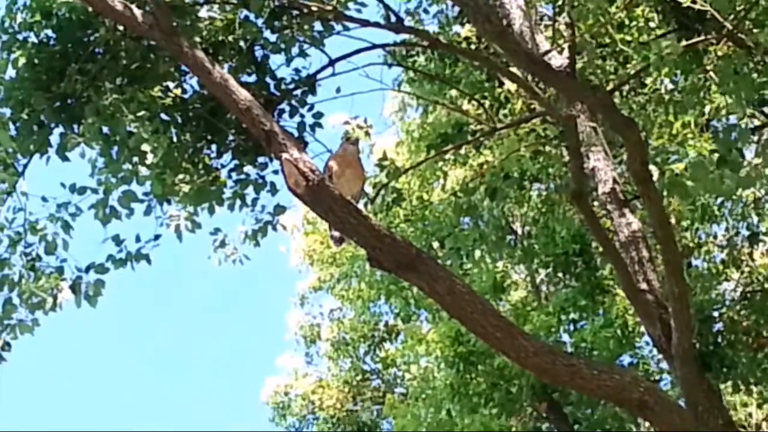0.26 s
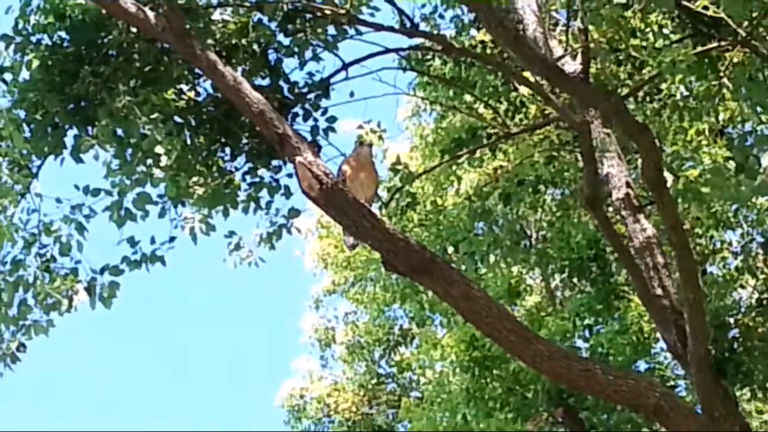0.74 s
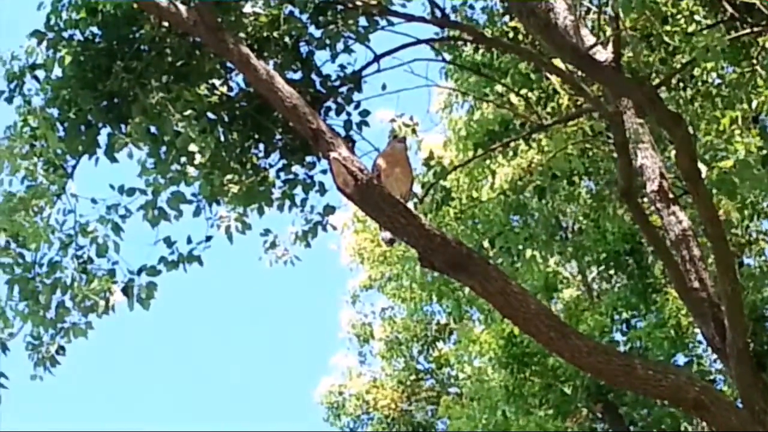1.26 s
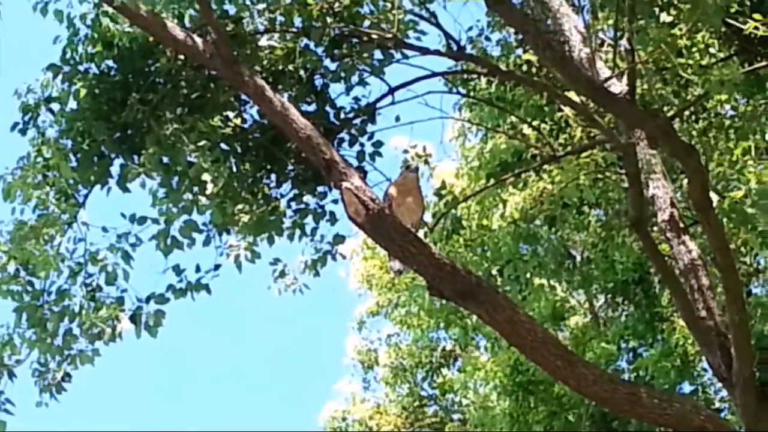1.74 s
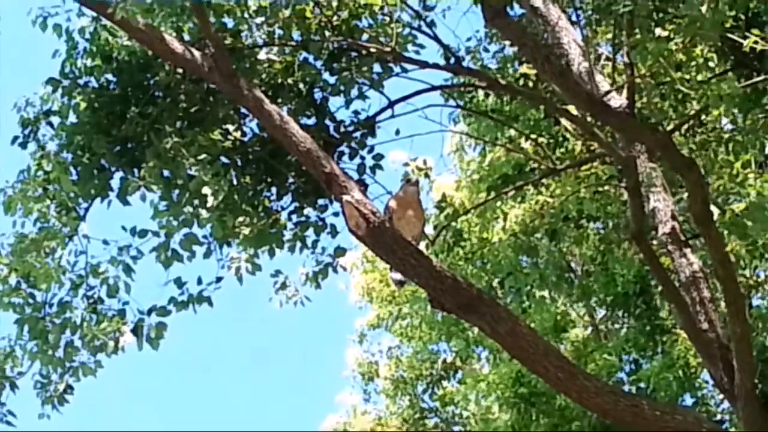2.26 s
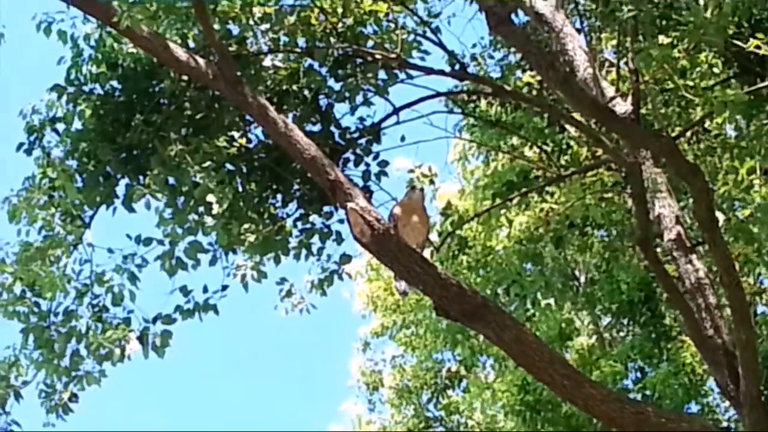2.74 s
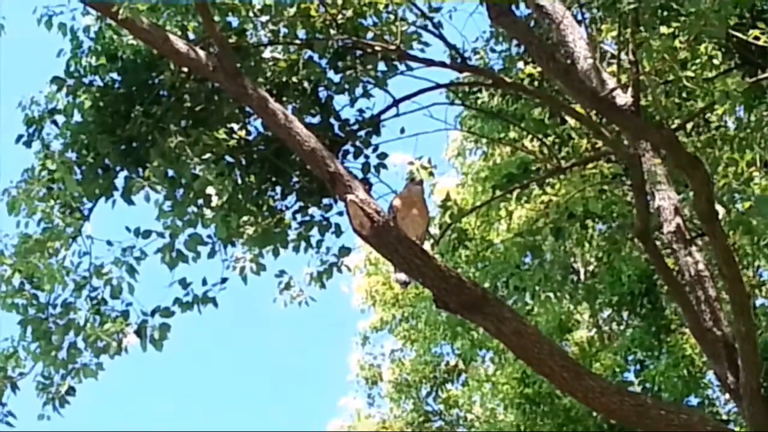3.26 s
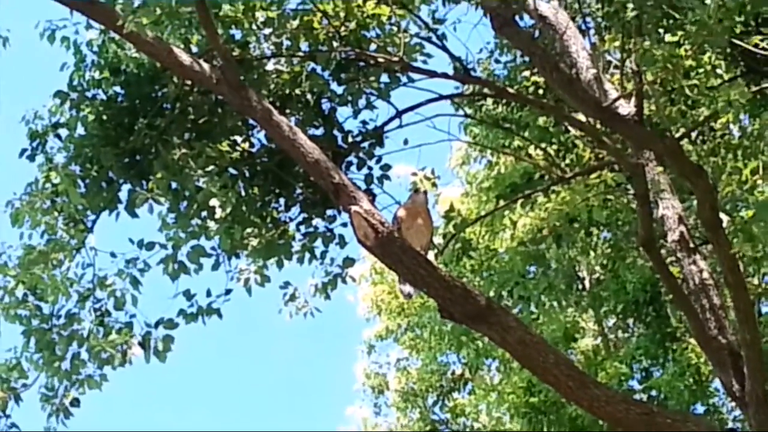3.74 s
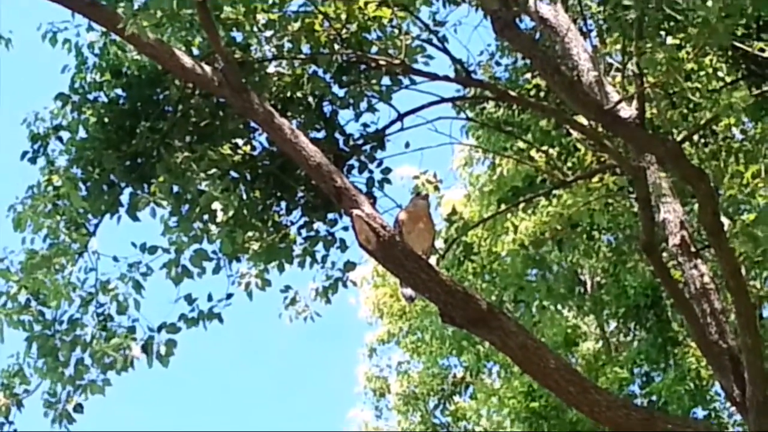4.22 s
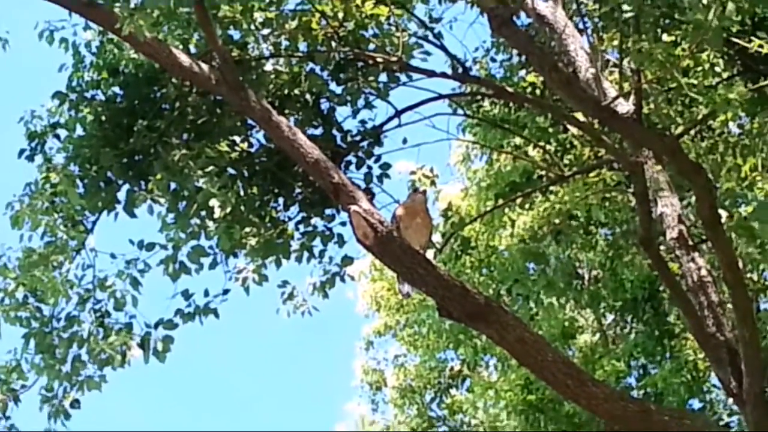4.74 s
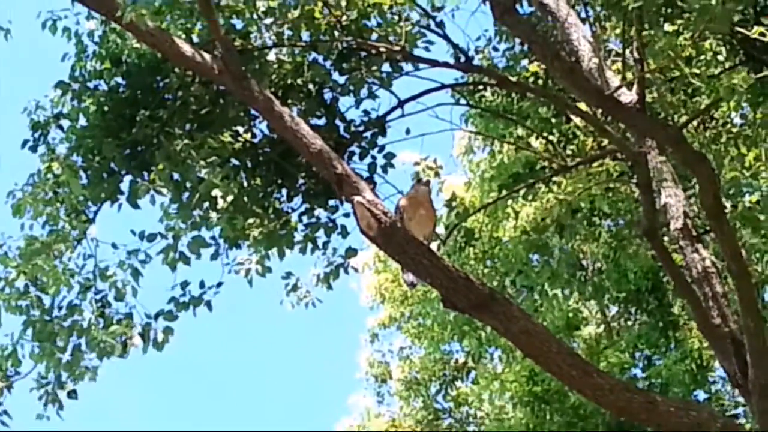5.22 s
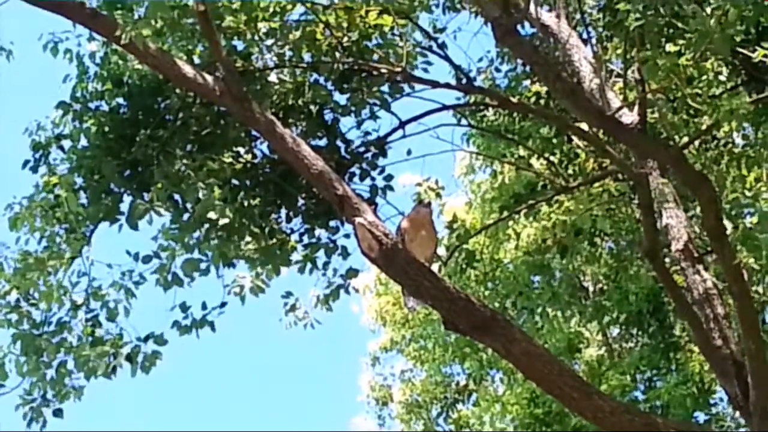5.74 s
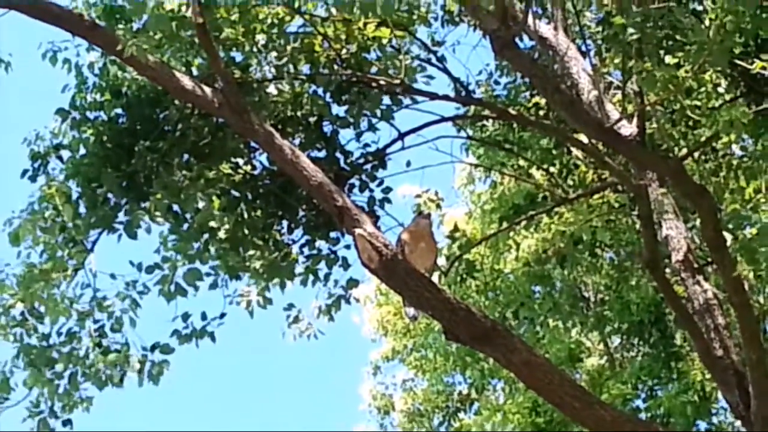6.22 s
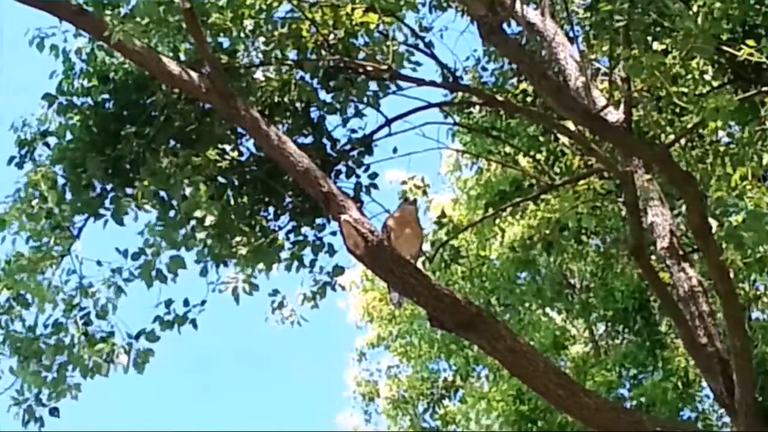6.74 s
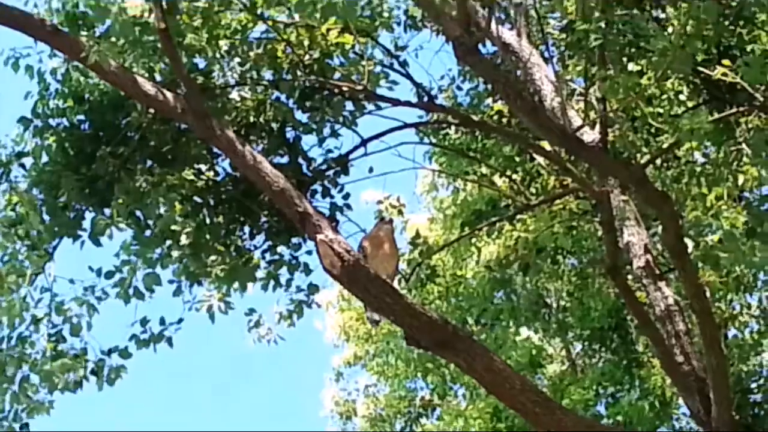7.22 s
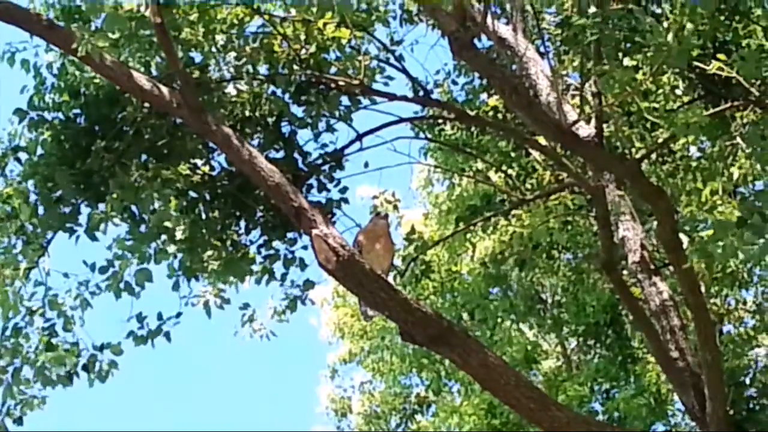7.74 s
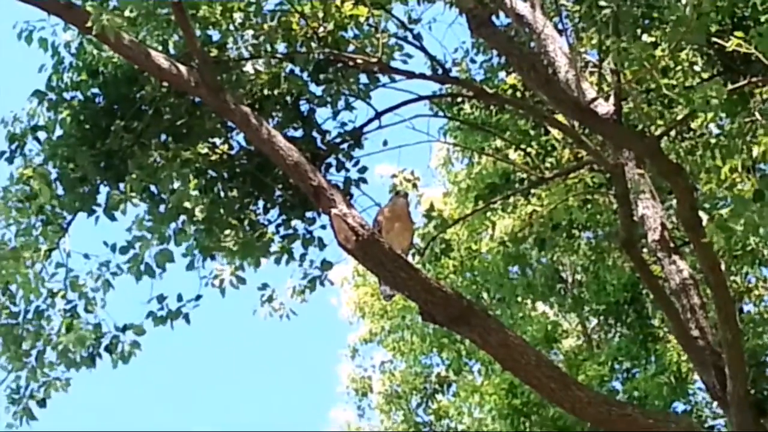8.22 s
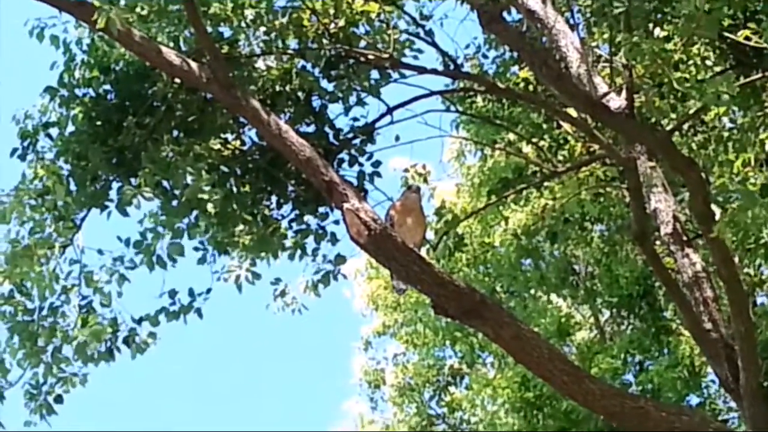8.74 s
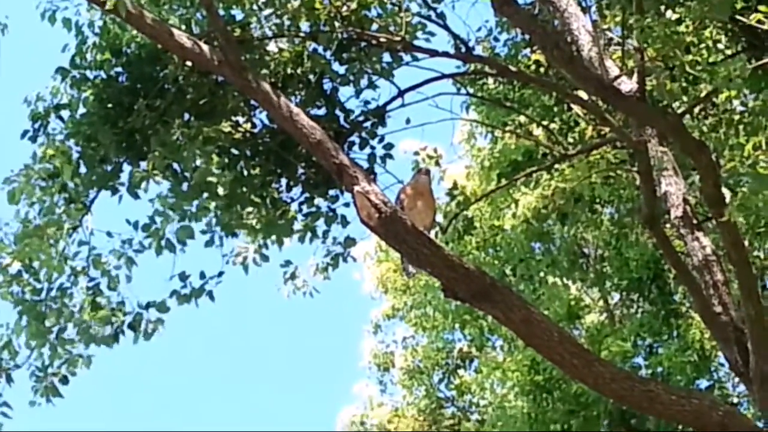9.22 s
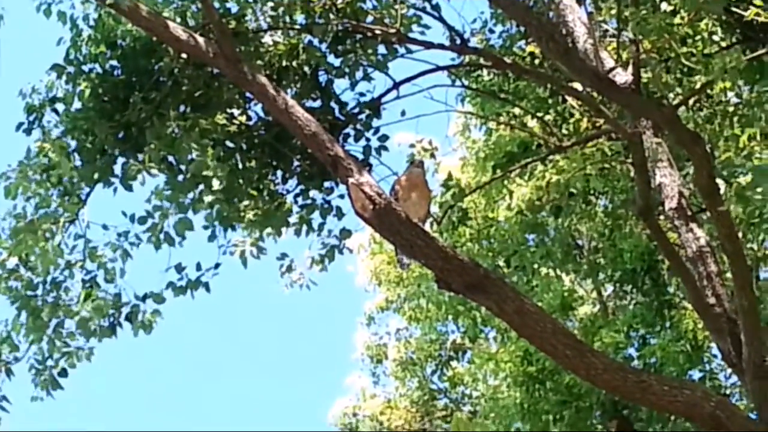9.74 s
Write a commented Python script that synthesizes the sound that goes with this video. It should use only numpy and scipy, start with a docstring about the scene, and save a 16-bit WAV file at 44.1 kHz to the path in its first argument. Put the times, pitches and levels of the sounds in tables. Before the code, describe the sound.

Outdoors under leafy trees, a perched hawk screams about once a second, eleven times. Each cry whoops quickly upward, falls loud and piercing, then cracks to a softer, lower tail. Wind rumbles and thumps against a hand-held stereo microphone, harder on the left, easing in the middle and growing heavy and clipping late. Faint leaf hiss and distant traffic lie behind.

```python
"""A hawk overhead screams eleven times: a quick upward whoop, a loud falling note, a break to a softer low
note. Each scream is a sum of twelve partials on one gliding pitch, roughened by breath and echoed by foliage.
Gusts buffet the two ports of a hand-held recorder, the left harder, as band-limited noise and short swings. The
recorder's case ticks (filtered impulses), and a brief buzz sounds once (odd partials). Leaves and far traffic
hiss behind (bands of noise), with a faint narrow hum."""
import sys
import numpy as np
from scipy import signal
from scipy.io import wavfile

SR = 44100
rng = np.random.default_rng(int(sys.argv[2]) if len(sys.argv) > 2 else 0)


def log_audio(samples):
    """Write samples as a 16-bit WAV file to the path given in sys.argv[1]."""
    # one column per channel
    frames = np.atleast_2d(samples).T
    # limit to full scale, then quantise
    limited = np.clip(frames, -1, 1)
    pcm = np.round(limited * 32767).astype(np.int16)
    wavfile.write(sys.argv[1], SR, pcm)


N = 439677  # samples, just under ten seconds

# Far background spectrum. Each row: frequency in Hz, relative density in dB per Hz.
AIR_SPECTRUM = [(24, -38), (40, -6), (233, -16.5), (419, -23.5), (461, -10.5), (869, -10), (1240, -13),
                (4830, -35.5), (7210, -58.5), (9110, -24.5), (11000, -71.5), (14300, -92), (22000, -120)]
# Correlation of the background at the ports. Each row: frequency in Hz, likeness (later held within -1 to 1).
PORT_LIKENESS = [(60, -0.54), (220, 1), (820, 0.36), (3050, -2.3), (11300, 0.14)]
# Rustle of the leaves. Each row: time in seconds, level of the hiss in dB.
RUSTLE_LEVEL = [(0, -53), (.75, -55.5), (1.6, -56.5), (2.7, -60), (3.8, -58.5), (4.75, -57.5), (5.7, -59),
                (6.6, -53.5), (7.55, -55.5), (8.5, -55.5), (9.0, -53.5), (9.45, -57), (9.97, -54)]
# Resonant bands of the rustle. Each row: centre in Hz, width in Hz, relative level in dB.
RUSTLE_BANDS = [(2800, 1600, 9.5), (4770, 510, 2.5), (5800, 1100, -3), (9060, 1000, 2.5)]
AIR_DB = -44.5  # rms over both ports
RUSTLE_FLICKER_DB = 1.5  # rms of each band's level
RUSTLE_TOP_HZ = 10200
HUM_HZ, HUM_DB = 533.6, -53

# Ticks of the case. Each row: time in seconds, level in dB, left minus right in dB, upper edge in Hz.
CASE_TICKS = [(0.7175, -22.5, -15, 2180), (1.3467, -14, -9, 2420), (4.788, -24.5, -8, 6000),
              (6.1559, -20, 0, 5150), (6.2565, -15, -14, 4000), (6.5133, -24, 1, 4740),
              (6.54, -24, -8, 3500), (6.606, -24, -6, 4800), (6.6879, -22.5, -5, 3500),
              (8.3998, 5, -28, 3404), (9.0384, -21, 50, 3500)]
# Envelope of the buzz. Each row: time in seconds, level in dB.
BUZZ_LEVEL = [(5.93, -82), (5.98, -32.5), (6.38, -37), (6.42, -75.5)]
# Odd partials of the buzz. Each row: multiple of the fundamental, relative level in dB.
BUZZ_PARTIALS = [(1, 1), (3, -32.5), (5, -16.5), (7, -13), (9, -16.5)]
BUZZ_HZ, BUZZ_PAN_DB = 196, 3.0

# Wind drive. Each row: time in seconds, mean gust at the left port in dB, at the right port in dB.
GUSTS = [(0, -14, -20), (.2, -36.5, -28.5), (.45, -29, -27), (.85, -19, -26), (1.1, -28, -34),
         (1.27, -37.5, -47), (1.5, -30, -30), (1.78, -30.5, -35.5), (2.1, -66, -52.5), (2.85, -53, -55),
         (3.05, -31, -30.5), (3.25, -49, -58), (3.55, -61, -48), (3.73, -24, -20.5), (3.88, -41.5, -70),
         (4.02, -43, -20), (4.3, -34, -53), (4.75, -37.5, -38), (5.1, -34, -31), (5.27, -50, -61),
         (5.75, -44, -40.5), (6, -27.5, -25), (6.55, -25, -25.5), (6.78, -16.5, -17), (7, -28, -38),
         (7.25, -27, -28.5), (7.4, -17.5, -21.5), (7.85, -22, -31.5), (8, -45.5, -43), (8.13, -19, -27),
         (8.55, -15, -17.5), (8.85, -23.5, -23), (9.1, -18.5, -22), (9.25, -30, -29), (9.4, -22.5, -22.5),
         (9.74, -26.5, -22), (9.86, -74, -45), (9.97, -26, -19)]
# Placed buffets. Each row: centre in seconds, envelope peak in dB, frequency in Hz, port (0 left, 1 right).
PLACED_BUFFETS = [(0.025, -8, 298, 0), (.038, -3, 339, 0), (.056, -5.5, 323, 0), (0.447, -4, 314, 0),
                  (0.771, -5, 263, 0), (.785, -2, 423, 0), (.812, 0, 300, 0), (0.83, 0, 233, 0),
                  (0.856, 1.5, 377, 0), (.937, -4.5, 320, 0), (1.039, -9.5, 286, 0), (1.419, -9, 235, 0),
                  (1.647, 0.5, 320, 0), (3.697, -10, 273, 1), (5.122, -9.5, 206, 0), (6.149, -4, 259, 0),
                  (6.183, -2, 330, 0), (6.676, -8, 237, 0), (6.727, 2.8, 275, 0), (6.766, -3.5, 318, 0),
                  (6.769, -6, 243, 1), (6.837, -2.5, 320, 0), (6.851, -8, 373, 0), (6.914, -0.5, 383, 0),
                  (7.06, -4.5, 280, 0), (7.331, -3, 246, 0), (7.508, -5, 292, 0), (7.543, -2.5, 484, 0),
                  (7.622, 1.5, 288, 0), (7.791, 4, 330, 0), (7.826, 5.5, 280, 0), (8.179, 3.5, 418, 0),
                  (8.203, -19, 339, 0), (8.235, -4, 366, 0), (8.403, 5, 414, 0), (8.415, -5, 370, 0),
                  (8.468, 4.5, 270, 0), (8.479, -6, 269, 0), (8.523, -5, 390, 0), (8.595, 0.5, 293, 0),
                  (8.624, 7.5, 520, 0), (8.644, 0.5, 324, 1), (8.651, 3, 383, 0), (8.687, 0, 446, 0),
                  (8.7, -9, 309, 0), (8.744, -4.5, 233, 1), (8.864, -2, 377, 0), (9.04, 3, 330, 0),
                  (9.057, 1.3, 292, 0), (9.179, -2, 352, 0), (9.193, -1, 420, 0), (9.345, -1, 440, 0),
                  (9.387, -2, 294, 0), (9.44, -5, 222, 1), (9.683, -5.5, 237, 1), (9.698, -3.5, 280, 1),
                  (9.711, -4, 289, 1), (9.737, -5.5, 233, 1)]
GUST_WANDER_DB = 3.87  # rms, independent at each port
LUMPY_DB, RUMBLE_RISE = 11.0, .58  # bound of the eddies' level in dB; exponent tilting the rumble with gust
PORT_TOP_HZ = (528, 330)  # the left port's rumble reaches higher
PORT_DEEP_DB, PORT_HIGH_DB = (-2, -2), -1  # shares of the deep and of the higher rumble
# lesser buffets: mean rate per port, level over the gust, a quarter of the full range, mid frequency per port
SMALL_PER_S, SMALL_OVER_DB, SMALL_SPREAD_DB, SMALL_HZ = 22, 9.5, 4, (287, 214.3)
BUFFET_CYCLES = .8  # half-width of the Gaussian envelope at 1/e

CROWN_DB, CROWN_GAP_S = -21, .012  # echo gain before the treble loss; delay
CROWN_T60_S, CROWN_CUT_HZ = .93, 8000  # scatter from leaves and boughs; the foliage returns less treble

# Pitch landmarks. Each row: top of the whoop in seconds, crest in Hz, slip in seconds, pitch before it in Hz,
# break in seconds, start of the low note in Hz, its middle in Hz, pitch before the droop in Hz, end in seconds.
SCREAMS = [(.031, 1369, .253, 1189, .332, 1035, 975, 907, .621),
           (.919, 1372, 1.150, 1192, 1.213, 1036, 972, 925, 1.454),
           (1.803, 1354, 2.025, 1195, 2.121, 1030, 958, 914, 2.455),
           (2.921, 1356, 3.204, 1192, 3.271, 1020, 983, 926, 3.574),
           (3.971, 1362, 4.242, 1200, 4.313, 1036, 978, 928, 4.584),
           (4.916, 1361, 5.135, 1196, 5.186, 1033, 973, 908, 5.496),
           (5.838, 1353, 6.060, 1190, 6.104, 1034, 977, 894, 6.409),
           (6.780, 1354, 7.002, 1197, 7.042, 1027, 970, 884, 7.378),
           (7.745, 1340, 7.987, 1184, 8.000, 1022, 968, 895, 8.306),
           (8.667, 1345, 8.873, 1188, 8.909, 1038, 952, 900, 9.264),
           (9.613, 1356, 9.810, 1186, 9.834, 1032, 973, 900, 10.104), ]
# Departures of each scream. Each row: effort at the crest in dB, at the knee in dB, early in the low note in dB,
# late in it in dB, throat's lift in the high note in dB, in the low note in dB.
MOODS = [(2.5, -0.5, -6.5, 0.5, 0, -0.5), (1.5, 0.5, -4.5, 1, -1, -1.5), (2.5, 1, -6, -1.5, -1, -1),
         (0.5, 0, -5.5, -0.5, 0, -1), (0, -1, -4.5, 0, 0.5, -2), (1, 0.5, -6, -0.5, 0, -0.5),
         (1.5, 0, -5.5, 0, 0.5, -0.5), (1.5, -1, -6, 0, 0, 0), (0, -1, -5.5, 0.5, -1, -1),
         (-0.5, -3.5, -6.5, 1.5, 0, -0.5), (-0.5, -2.5, -5, -4, 1.5, 1)]
# Rising lead-in. Each row: seconds from the top, pitch in Hz, effort before the mood in dB,
# throat's lift before the mood in dB.
WHOOP = [(-.050, 641, -38, -1.5), (-.035, 700, -22, -13), (-.028, 740, -12, -5.5), (-.021, 903, -8, -5.5),
         (-.011, 1040, -4, -5), (-.009, 1246, 4, -9)]
# Last fall. Each row: seconds from the end, pitch in Hz.
DROOP = [(-.015, 855), (0, 782), (.012, 665)]
# Throat, beak and path to the left port. Each row: frequency in Hz, gain of a partial in dB.
LEFT_PORT_GAIN = [(750, -70.5), (900, -29), (1050, -40.5), (1250, -31.5), (1500, -41), (1800, -23),
                  (1950, -17), (2500, -9), (2700, -15), (2850, -9), (3200, -25), (3500, -19.5), (3850, -28),
                  (4400, -27.5), (4800, -24), (5700, -42.5), (7100, -34), (7400, -38.5), (8100, -38.5),
                  (8600, -47.5), (10000, -43), (11000, -55)]
# The same to the right port. Each row: frequency in Hz, gain of a partial in dB.
RIGHT_PORT_GAIN = [(750, -48), (900, -31), (1050, -33), (1250, -29.5), (1500, -38), (1900, -7),
                   (2200, -12.5), (2500, -8), (3250, -24.5), (3600, -18), (3850, -38.5), (4050, -25),
                   (4400, -41), (4750, -16), (5100, -36), (5300, -23), (6300, -44.5), (7100, -47),
                   (7600, -47), (8050, -47), (8400, -54), (9200, -71), (10000, -98), (11000, -72)]
# Phase lead of the left port over the right. Each row: frequency in Hz, lead in radians.
LEFT_LEADS = [(1300, -.3), (1850, 0), (2000, 2.4), (2200, 2.2), (2300, .8), (2550, .1), (2700, -2.6),
              (2850, -.2), (3150, .1), (3250, -1), (3700, 0), (4000, -.8), (5000, .4), (5150, -1),
              (6200, 1), (7500, 0), (8300, -.6), (9600, .5), (10000, -1.5)]
TOP_UNDER_HZ, CREST_S = 24, .022  # the whoop tops out flat and reaches the crest soon after
KNEE_S, KNEE_OVER_HZ = .05, 56  # knee of the high note, ahead of the slip and above its pitch
SLIP_S, SLIPPED_HZ, BREAK_S, BREAK_HZ = .010, 1138, .002, 1083  # a short shelf sags to the break
SETTLE_S, DROOP_S = .06, .045  # after the break; before the end
SAG_UNDER_HZ, BOW_OVER_HZ = 7, 9  # the high note hangs under a straight line, the low note bows over one
DYING_S, DYING_DB, DYING_PITCH = .012, -12, .92  # last step of the fall; pitch as a ratio

# Push before the mood: effort in dB, throat's lift of the second partial in dB, brightness in dB per octave.
AT_TOP, AT_CREST = (10.2, -7, .23), (12.2, -6.5, -2.5)
AT_HALF_SAG, AT_KNEE = (7, -2.9, -1.5), (3.44, .41, -2.9)
AT_SLIP, AT_SHELF, AT_BREAK = (4.15, -1.4, -2.3), (5.4, -6, -.3), (1, -4, .33)
AT_SETTLED, AT_MIDDLE, AT_DROOP = (-2, 1.9, 3), (-5, -3.3, .19), (-12, 2.8, .5)
AT_FALL = [(-8.5, 2.5, -1.5), (-13, .85, -.82), (-14, 2, -2)]
PARTIALS, BRIGHT_PIVOT_HZ = 12, 2500
WAVER, SHIMMER_DB = .0016, .8  # rms: pitch as a ratio; level of the first partial
THROAT_WOBBLE_DB, BRIGHT_WOBBLE_DB = .6, .7  # rms of the slow unsteadiness of colour
SWELL_DB, SWELLS_PER_S = 1.4, 8  # rms and corner rate: upper partials swell and fade one by one
# breath roughness of the first partial
HOARSE_DB, WHOOP_HOARSE_DB, DYING_HOARSE_DB, BREAK_HOARSE_DB = -47, -21, -29, -31
HOARSE_GROWTH, CRACK_S = 2.13, .012  # exponent over partial number; half-length of the crack

CUTOFF_HZ = 11886


def from_db(db):
    """Level to amplitude: twenty decibels are a factor of ten."""
    return 10 ** (np.asarray(db) / 20)


def rms_one(x):
    """Normalisation to unit root-mean-square amplitude."""
    return x / np.sqrt(np.mean(x ** 2) + 1e-20)


def in_time(rows):
    """Linear interpolation of a table's columns at every sample."""
    s, *columns = np.transpose(rows)
    return [np.interp(np.arange(N) / SR, s, c) for c in columns]


def at_hz(points, hz):
    """A spectrum interpolated on a logarithmic frequency axis."""
    where, value = np.transpose(points)
    return np.interp(np.log(hz), np.log(where), value)


def drift(rate):
    """Random modulation of unit rms: white noise through a double pole at the given rate in Hz."""
    r = np.exp(-2 * np.pi * rate / SR)
    noise = rng.standard_normal(N + SR)
    return rms_one(signal.lfilter([1], [1, -2 * r, r * r], noise)[SR:])  # the filter settles for a second


def band(x, low_hz, high_hz):
    """Band-pass filtering, maximally flat in the pass band."""
    return signal.sosfilt(signal.butter(2, [low_hz, high_hz], "band", fs=SR, output="sos"), x)


def sides(pan_db):
    """Stereo gains by level difference, with the mean of the two powers held constant."""
    left = from_db(pan_db)
    return np.array([left, np.ones_like(left)]) * 2 / np.sqrt(1 + left ** 2)


def hum():
    """Narrow-band noise is heard as a single wavering tone."""
    return from_db(HUM_DB) * rms_one(band(rng.standard_normal(N), HUM_HZ - 12, HUM_HZ + 12))


def air():
    """Far traffic and breeze: half-octave noise whose mid and side shares set the correlation of the ports."""
    edges = 35 * 2 ** np.arange(0, 8.6, .5)
    white = rng.standard_normal((2, 2, N))  # neighbouring bands take unrelated noise
    out = np.zeros((2, N))
    for k, (low_hz, high_hz) in enumerate(zip(edges, edges[1:])):
        mid, side = band(white[k % 2], low_hz, high_hz)
        hz = np.sqrt(low_hz * high_hz)
        alike = np.clip(at_hz(PORT_LIKENESS, hz), -1, 1)
        common = np.sqrt(1 + alike) * mid
        opposed = np.sqrt(1 - alike) * side * [[1], [-1]]
        out += from_db(at_hz(AIR_SPECTRUM, hz)) * (common + opposed)
    return from_db(AIR_DB) * rms_one(out)


def leaves():
    """Many small impacts merge into noise, gathered in a few flickering bands; the hiss is cut above about 10
    kHz."""
    white = rng.standard_normal((2, N))
    hiss = np.zeros((2, N))
    for hz, width_hz, level_db in RUSTLE_BANDS:
        flicker = from_db(level_db + RUSTLE_FLICKER_DB * drift(11))
        hiss += flicker * rms_one(band(white, hz - width_hz / 2, hz + width_hz / 2))
    rustle = from_db(in_time(RUSTLE_LEVEL)[0]) * hiss
    return signal.sosfilt(signal.butter(10, RUSTLE_TOP_HZ, fs=SR, output="sos"), rustle)


def case():
    """Plastic gives dry band-limited impulses; a brief buzz sounds as a harmonic series of odd orders."""
    out = np.zeros((2, N + 400))
    for s, level_db, pan_db, edge_hz in CASE_TICKS:
        tick = band(signal.unit_impulse(400), 960, edge_hz)
        start = round(s * SR)
        out[:, start:start + 400] += from_db(level_db) * sides(pan_db)[:, None] * tick / tick.max()
    turn = 2 * np.pi * BUZZ_HZ * np.arange(N) / SR
    buzz = sum(from_db(level_db) * np.sin(k * turn) for k, level_db in BUZZ_PARTIALS)
    return out[:, :N] + from_db(in_time(BUZZ_LEVEL)[0]) * buzz * sides(BUZZ_PAN_DB)[:, None]


def gust_db():
    """Slowly varying wind strength at the left and the right port."""
    return np.array(in_time(GUSTS))


def wind():
    """Turbulence: unrelated noise at each port, its spectrum tilting upward as the gust strengthens."""
    gusts = from_db(gust_db() + GUST_WANDER_DB * np.array([drift(10), drift(12)]))
    out = []
    for top_hz, deep_db, gust in zip(PORT_TOP_HZ, PORT_DEEP_DB, gusts):
        lumps = from_db(LUMPY_DB * np.tanh([drift(25), drift(45)]))
        eddies = rng.standard_normal((2, N)) * lumps
        low = rms_one(band(eddies[0], 75, 219))
        high = rms_one(band(band(eddies[1], 140, top_hz), 110, 1.39 * top_hz))
        deep_rumble = from_db(deep_db) * low * (gust / .038) ** -RUMBLE_RISE
        high_rumble = from_db(PORT_HIGH_DB) * high * (gust / .27) ** RUMBLE_RISE
        out.append(gust * (deep_rumble + high_rumble))
    return np.array(out)


def small_buffets():
    """Lesser buffets at random times on either port, their level following the gust of the moment."""
    draws, gust = rng.random((800, 5)), gust_db()
    chosen = draws[draws[:, 1] < 2 * SMALL_PER_S * N / SR / len(draws)]
    rows = []
    for when, _, side, size, tone in chosen:
        port = int(side > .5)
        peak_db = gust[port, int(when * N)] + SMALL_OVER_DB + SMALL_SPREAD_DB * (4 * size - 2)
        rows.append((when * N / SR, peak_db, SMALL_HZ[port] * 1.27 ** (tone - .5), port))
    return rows


def buffets():
    """A pressure pulse at one port: a brief sinusoid under a symmetric Gaussian envelope."""
    out, t = np.zeros((2, N + 2000)), np.arange(-1000, 1000) / SR
    for s, peak_db, hz, port in PLACED_BUFFETS + small_buffets():
        phase = rng.uniform(0, 2 * np.pi)
        shape = np.exp(-(t * hz / BUFFET_CYCLES) ** 2) * np.sin(2 * np.pi * hz * t + phase)
        start = round(s * SR)
        out[int(port > .5), start:start + 2000] += from_db(peak_db) * shape
    return out[:, 1000:N + 1000]


def crown(x):
    """Diffuse scattering: convolution with decaying noise, unrelated at the two ports, for the foliage."""
    t = np.arange(SR) / SR
    echoes = rng.standard_normal((2, SR)) * from_db(-60 * t / CROWN_T60_S) * (t > CROWN_GAP_S)
    echoes /= np.sqrt(np.sum(echoes ** 2, axis=1, keepdims=True))
    dull = signal.sosfilt(signal.butter(1, CROWN_CUT_HZ, fs=SR, output="sos"), echoes)
    return from_db(CROWN_DB) * signal.fftconvolve(x, dull, axes=1)[:, :N]


def scream(top, crest_hz, slip, slip_hz, snap, low_hz, middle_hz, droop_hz, end, mood):
    """Piecewise-linear control of the voice: whoop, crest, sag, slip, break, low note, droop and fall.
    Each row: time in seconds, pitch in Hz, effort in dB, throat's lift in dB, brightness in dB per octave."""
    crest, knee, middle = top + CREST_S, slip - KNEE_S, (snap + end) / 2
    settled, droop = snap + SETTLE_S, end - DROOP_S
    knee_hz = slip_hz + KNEE_OVER_HZ
    settled_hz = np.interp(settled, [snap, middle], [low_hz, middle_hz])
    half_droop = np.mean([AT_MIDDLE, AT_DROOP], axis=0)
    rows = [(top + s, hz, db, lift_db, 0) for s, hz, db, lift_db in WHOOP]
    rows += [(top, crest_hz - TOP_UNDER_HZ, *AT_TOP),
             (crest, crest_hz, *AT_CREST),
             ((crest + knee) / 2, (crest_hz + knee_hz) / 2 - SAG_UNDER_HZ, *AT_HALF_SAG),
             (knee, knee_hz, *AT_KNEE),
             (slip, slip_hz, *AT_SLIP),
             (slip + SLIP_S, SLIPPED_HZ, *AT_SHELF),
             (snap - BREAK_S, BREAK_HZ, *AT_BREAK),
             (snap + BREAK_S, low_hz, *AT_BREAK),
             (settled, settled_hz, *AT_SETTLED),
             (middle, middle_hz, *AT_MIDDLE),
             ((middle + droop) / 2, (middle_hz + droop_hz) / 2 + BOW_OVER_HZ, *half_droop),
             (droop, droop_hz, *AT_DROOP)]
    rows += [(end + s, hz, *push) for (s, hz), push in zip(DROOP, AT_FALL)]
    last, last_hz, last_db = rows[-1][:3]
    rows = np.array(rows + [(last + DYING_S, last_hz * DYING_PITCH, last_db + DYING_DB, 0, 0)])
    rows[:, 2] += np.interp(rows[:, 0], [crest, knee, settled, droop], mood[:4])
    rows[:, 3] += np.where(rows[:, 0] < snap, mood[4], mood[5])
    quiet_before = (top - .075, rows[0, 1], -90, 0, 0)
    quiet_after = (last + 1.6 * DYING_S, rows[-1, 1], -90, 0, 0)
    return [quiet_before, *map(tuple, rows), quiet_after]


def breath_roughness():
    """Turbulent breath, strongest in the whoop, at the crack of the break and in the dying end."""
    rows = []
    for top, _, _, _, snap, *_, end in SCREAMS:
        rows += [(top - .02, WHOOP_HOARSE_DB), (top + .02, HOARSE_DB)]
        rows += [(snap - CRACK_S, HOARSE_DB), (snap, BREAK_HOARSE_DB), (snap + CRACK_S, HOARSE_DB)]
        rows += [(end - .03, HOARSE_DB), (end + .01, DYING_HOARSE_DB)]
    return from_db(in_time(sorted(rows))[0])


def hawk():
    """Additive synthesis: harmonic partials shaped by throat, beak and path, each modulated by breath noise."""
    turns = [turn for row, mood in zip(SCREAMS, MOODS) for turn in scream(*row, mood)]
    pitch, effort_db, throat_db, bright = in_time(sorted(turns))
    pitch = pitch * (1 + WAVER * drift(60))
    throat_db = throat_db + THROAT_WOBBLE_DB * drift(20)
    bright = bright + BRIGHT_WOBBLE_DB * drift(15)
    phase = 2 * np.pi * np.cumsum(pitch) / SR
    breath = breath_roughness()
    out = np.zeros((2, N))
    for k in range(1, PARTIALS + 1):
        hz = k * pitch
        level_db = effort_db + throat_db * (k == 2) + bright * np.log2(hz / BRIGHT_PIVOT_HZ)
        level_db = level_db + SHIMMER_DB * np.sqrt(k) * drift(48)  # high partials flicker most
        level_db = level_db + SWELL_DB * (k > 2) * drift(SWELLS_PER_S)
        roughness = np.minimum(breath * k ** HOARSE_GROWTH, 1) * drift(270)
        swing = from_db(level_db) * (1 + roughness)
        left_phase = k * phase + at_hz(LEFT_LEADS, hz)
        out[0] += swing * from_db(at_hz(LEFT_PORT_GAIN, hz)) * np.sin(left_phase)
        out[1] += swing * from_db(at_hz(RIGHT_PORT_GAIN, hz)) * np.sin(k * phase)
    return out


def scene():
    """Superposition: the sound pressures of all sources add."""
    background = hum() + air() + leaves()
    handling = case() + wind() + buffets()
    bird = hawk()
    return background + handling + crown(bird) + bird


def record(dry):
    """Band limiting and overload: the deepest bass is filtered off, the peaks clip, then the top is cut."""
    heard = signal.sosfilt(signal.butter(3, 50, "high", fs=SR, output="sos"), dry)
    clipped = np.clip(heard, -1, 1)
    return signal.sosfilt(signal.cheby2(12, 70, CUTOFF_HZ, fs=SR, output="sos"), clipped)


dry = scene()
out = record(dry)
log_audio(out)
```